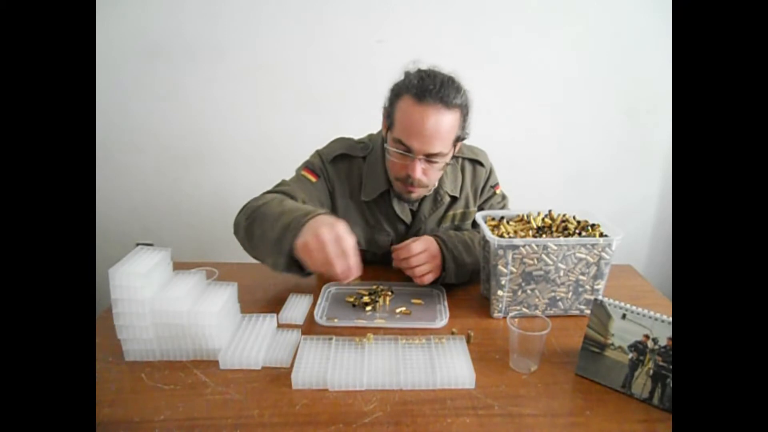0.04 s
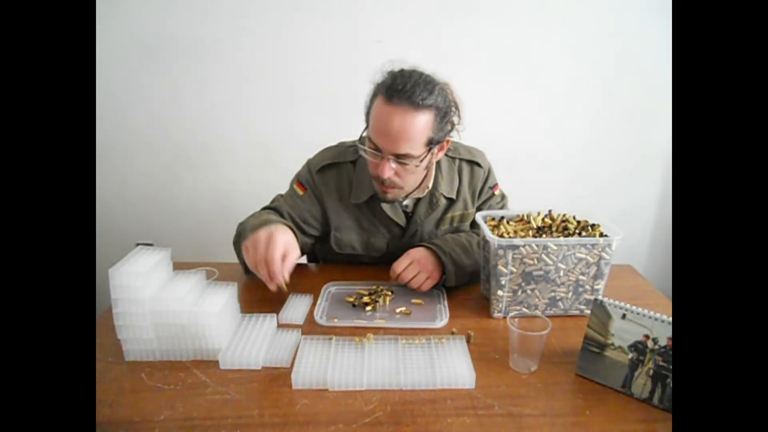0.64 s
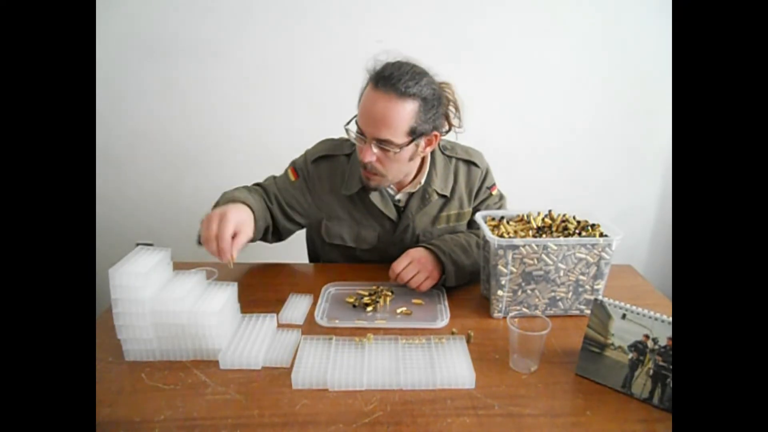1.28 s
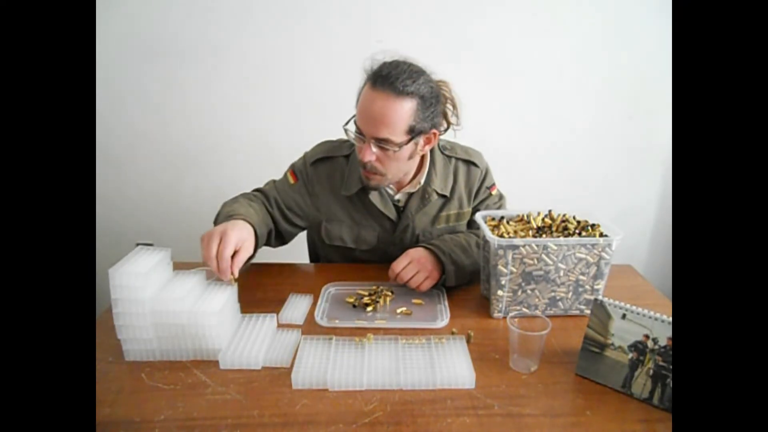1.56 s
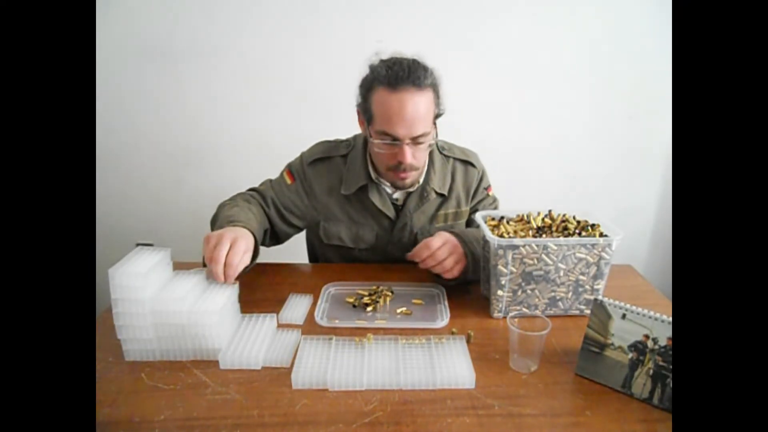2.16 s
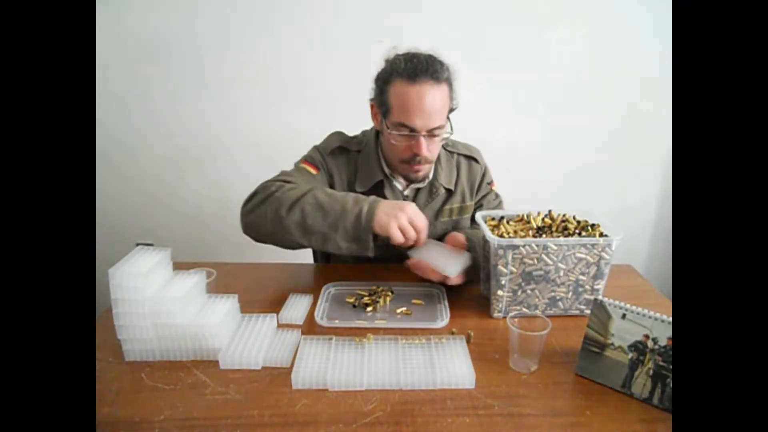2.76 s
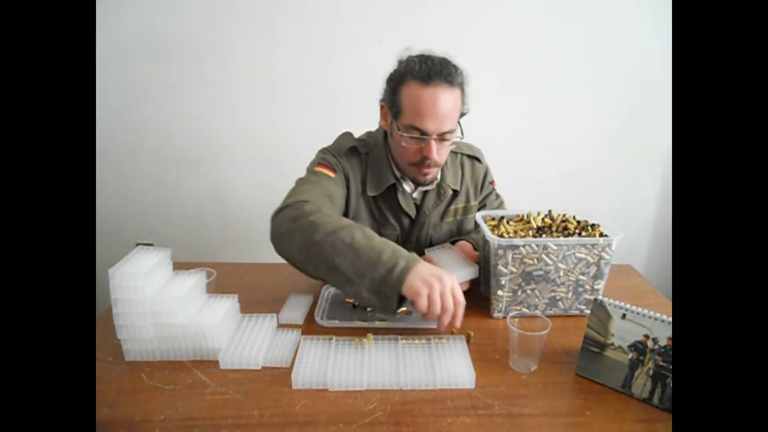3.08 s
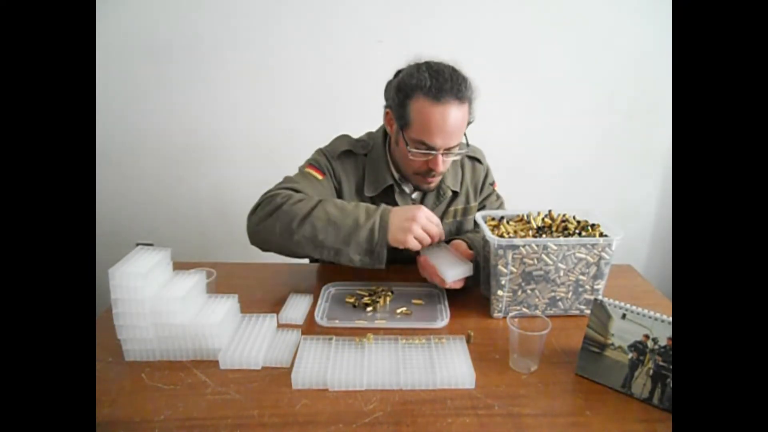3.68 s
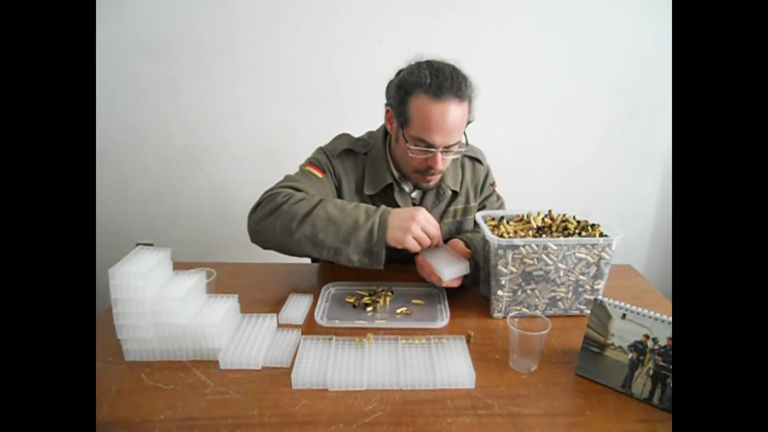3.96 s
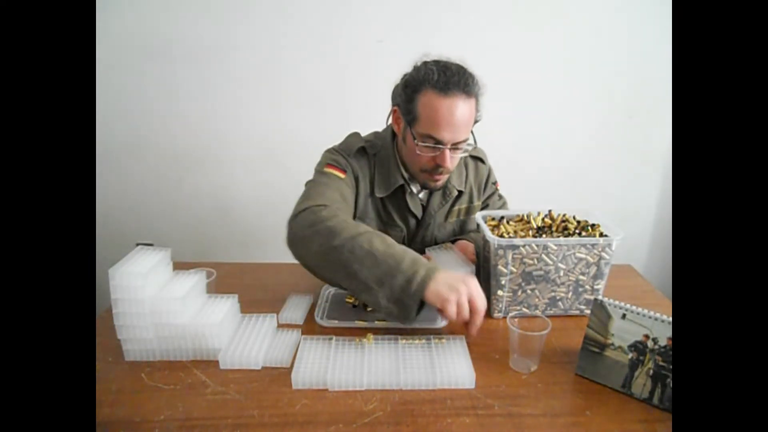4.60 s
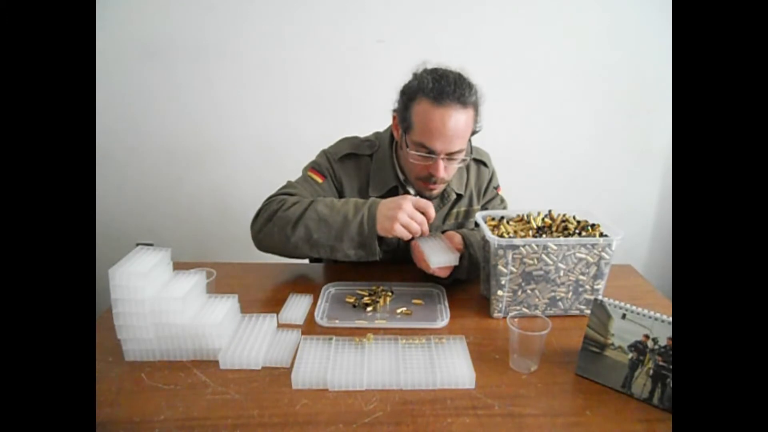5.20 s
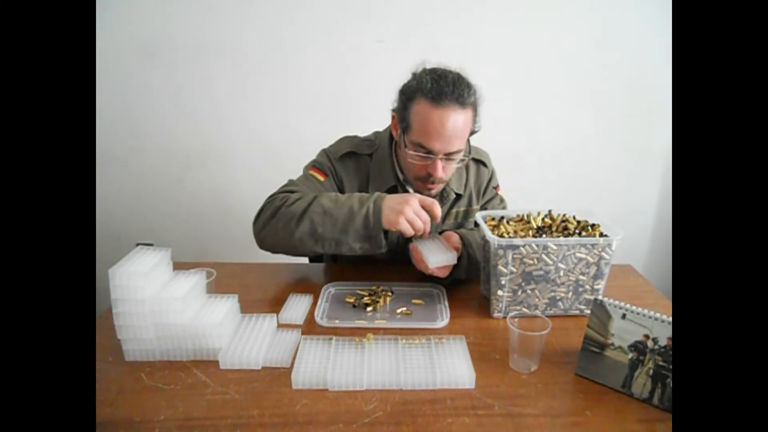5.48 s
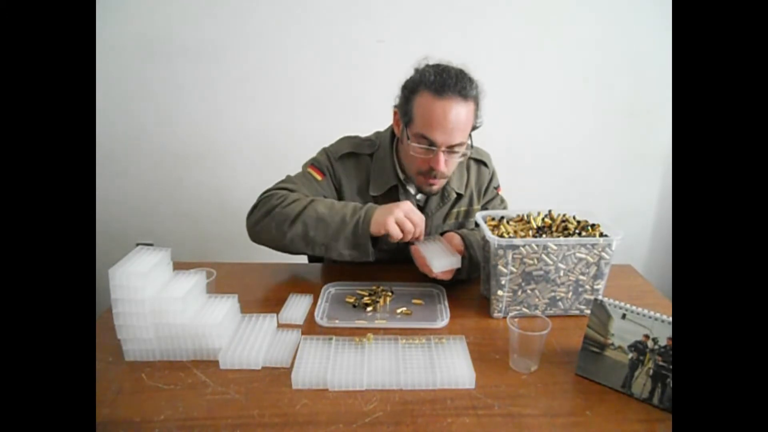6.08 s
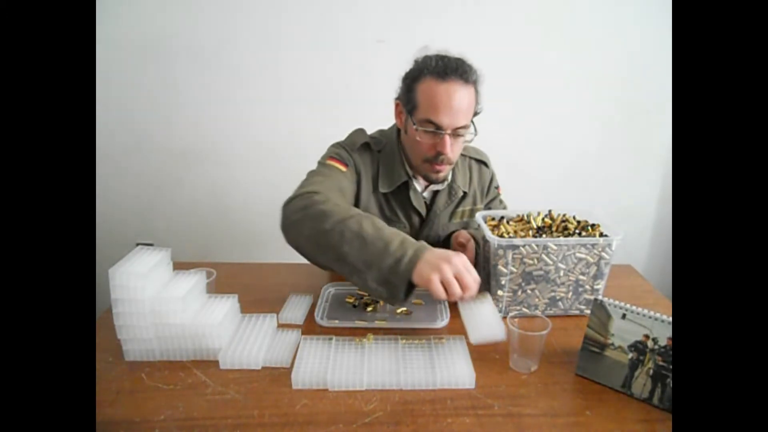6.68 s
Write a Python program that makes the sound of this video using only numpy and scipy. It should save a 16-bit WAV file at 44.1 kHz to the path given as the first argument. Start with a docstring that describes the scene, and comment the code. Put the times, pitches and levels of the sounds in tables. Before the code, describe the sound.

In a small, bare room with a soft hiss, plastic boxes bump gently on a table, with one harder knock. Metal cartridge cases rattle briefly, then one snaps sharply into a plastic box. Light clicks and scrapes continue with pauses, until a second sharp snap and a soft closing bump. The handling has a short echo, while faint, dry mechanical ticks come now and then from right beside the microphone.

```python
"""Cartridge cases into a plastic box

Brass cases are picked from a plastic tray and pushed into a plastic box at a wooden table.
Cases and boxes snap, rub and knock; the bare room rings after each blow.
A lens motor, probably, ticks near the microphone. Gain control ducks the hiss after the hardest blows."""
import sys
import numpy as np
from scipy import signal
from scipy.fft import rfft, irfft
from scipy.io import wavfile
from scipy.ndimage import minimum_filter1d

SR = 44100
rng = np.random.default_rng(int(sys.argv[2]) if len(sys.argv) > 2 else 0)


def put_to_file(sound):
    """Save the sound as 16-bit audio at rate SR, in the file named by the first command-line argument."""
    columns = np.atleast_2d(sound).T  # one column per channel
    safe = np.clip(columns, -1, 1)
    whole_steps = np.round(safe * 32767)
    wavfile.write(sys.argv[1], SR, whole_steps.astype(np.int16))


N = 301681
AGE = np.arange(SR // 4) / SR   # time since contact [s]


def from_db(db):
    """Decibels to gain."""
    return 10 ** (np.asarray(db) / 20)


def rms_one(x):
    """Scale to unit rms."""
    return x / np.sqrt(np.mean(x ** 2) + 1e-20)


def at_hz(points, hz, column=1):
    """Interpolate a table column over log frequency."""
    points = np.array(points)
    return np.interp(np.log(np.maximum(hz, 1)), np.log(points[:, 0]), points[:, column])


def coloured(x, spectrum):
    """Apply a smooth gain curve."""
    gain = from_db(at_hz(spectrum, np.fft.rfftfreq(len(x), 1 / SR)))
    return irfft(rfft(x) * gain, len(x))


def cut(x, hz, kind, order=2):
    """Butterworth filter."""
    sos = signal.butter(order, np.clip(hz, 10, SR / 2 - 500), kind, fs=SR, output="sos")
    return signal.sosfilt(sos, x)


def fade(t, t60_s):
    """Exponential decay, 60 dB in t60_s."""
    return np.exp(-np.log(1000) * t / t60_s)


def add(track, time_s, sound):
    """Mix a sound in at time_s."""
    start = int(round(time_s * SR))
    track[start:start + len(sound)] += sound[:N - start]


def ring(hz, db, t60_s, phase=0):
    """One struck mode."""
    return from_db(db) * fade(AGE, t60_s) * np.sin(2 * np.pi * hz * AGE + phase)


def struck(modes):
    """A body's modes after one blow; neighbours swing in antiphase."""
    return sum((-1) ** k * ring(*mode) for k, mode in enumerate(modes))


def crack(t60_s, edge_hz):
    """Bright noise burst as hard surfaces meet."""
    return cut(rng.standard_normal(len(AGE)), edge_hz, "high", order=1) * fade(AGE, t60_s)


def hiss(level_db=-51.2):
    """Steady room and microphone noise."""
    # noise spectrum: (frequency [Hz], relative density [dB])
    spectrum = [(10, -24), (22, -5), (100, -4), (260, -4), (450, -4.5), (750, -5), (1260, -6), (2000, -8.5),
                (3500, -10), (7700, -13), (10250, -14.5), (11000, -17.5)]
    return from_db(level_db) * rms_one(coloured(rng.standard_normal(N), spectrum))


def room(x, first_echo_s=0.0014, build_s=0.0068):
    """Bare walls: a dense tail, each band dying at its own rate."""
    # reverberation: (frequency [Hz], energy re input [dB], t60 [s])
    reverb = [(123, -3, 0.73), (320, 8, 0.72), (590, 6.5, 0.47), (1150, 5, 0.517), (1840, 3.5, 0.67),
              (2604.5, -5.5, 0.6), (3935, -5, 0.6), (5990, -5, 0.26), (9996, 0, 0.47)]
    t = np.arange(int(0.9 * SR)) / SR
    onset = np.clip((t - first_echo_s) / build_s, 0, 1)
    edges_hz = np.geomspace(80, 14000, 20)
    response = 0
    for low, high in zip(edges_hz, edges_hz[1:]):
        hz = np.sqrt(low * high)
        band = cut(rng.standard_normal(len(t)), [low, high], "band", order=3)
        tail = band * onset * fade(t, at_hz(reverb, hz, column=2))
        share = np.sqrt((high - low) / (SR / 2) / len(t))
        response += from_db(at_hz(reverb, hz)) * share * rms_one(tail)
    return signal.fftconvolve(x, response)[:N]


def lens_steps(step_s=0.1338):
    """Even motor steps, three contacts each: (time [s], level [dB], housing [dB])."""
    # lens moves: (first step [s], last step [s], first stop level [dB], change per step [dB])
    runs = [(2.1788, 2.446, -32, -2.5), (3.3786, 3.512, -39.5, 2), (6.3833, 6.651, -32, 0.6)]
    contacts = []
    for first_s, last_s, db, change_db in runs:
        for k, time_s in enumerate(np.arange(first_s, last_s + step_s / 2, step_s)):
            release = (time_s - 0.0053, -43.5, -14)
            stop = (time_s, db + k * change_db, -1.5)
            rebound = (time_s + 0.0115, -49, -11)
            contacts += [release, stop, rebound]
    return contacts


def lens_ticks(detune=0.008):
    """Small parts chatter against a stop and shake the housing."""
    # lone ticks as the lens settles: (time [s], level [dB], housing [dB])
    settling = [(3.2434, -46, -2), (3.2761, -47, -3), (3.294, -46, -15), (3.3056, -40, -21),
                (4.1756, -41, -18.5), (4.1884, -36, -2), (4.229, -44, -8.5), (4.2484, -47, -3),
                (4.2622, -45, -6.5)]
    # mechanism and housing: (frequency [Hz], level [dB], t60 [s])
    lens_modes = [(3300, 3.5, 0.0058), (4261.7, -8.5, 0.022), (5920, 1.5, 0.011), (6480, 5.5, 0.0047),
                  (8260, 10, 0.0059), (9200, 6, 0.0045), (9940, -0.5, 0.008792)]
    housing_modes = [(1434, 1.5, 0.02), (1600, 0.5, 0.017645)]
    out = np.zeros(N)
    attack = 1 - fade(AGE, t60_s=0.0024233)
    for time_s, db, housing_db in lens_steps() + settling:
        parts = sum(ring(hz * rng.normal(1, detune), mode_db, t60_s, phase=rng.uniform(0, 2 * np.pi))
                    for hz, mode_db, t60_s in lens_modes)
        housing = from_db(housing_db) * sum(ring(*mode) for mode in housing_modes)
        edge = crack(t60_s=0.018, edge_hz=1300)
        add(out, time_s, from_db(db) * attack * (parts + housing + edge))
    return out


def rubs(grain_db=8.5, box_band_hz=(2370, 2590)):
    """Sliding: a dense run of tiny slips that ring the box."""
    # brass and fingers on plastic: (start [s], length [s], level [dB], box resonance trim [dB])
    strokes = [(0.129, 0.026, -57, -6), (1.91, 0.04, -56.5, -9), (1.999, 0.05, -57, -2),
               (2.614, 0.13, -56.5, 5), (3.886, 0.073, -50.5, 3.5), (3.976, 0.017, -52.5, -11.5),
               (4.013, 0.014, -46, -4), (4.027, 0.003, -35, -14), (5.595, 0.066, -52.5, -4.5),
               (6.765, 0.037, -48, -29)]
    # friction spectrum: (frequency [Hz], gain [dB])
    spectrum = [(500, 11), (1500, 5), (3200, 10), (5000, 7), (7500, 5), (9000, 2.5), (10200, 8.5),
                (12000, 3)]
    out = np.zeros(N)
    for start_s, length_s, db, box_db in strokes:
        count = int(length_s * SR)
        slips = rng.standard_normal(count) * from_db(grain_db * np.minimum(rng.exponential(1, count), 4))
        stroke = rms_one(slips) * np.sqrt(np.sin(np.pi * np.arange(count) / count))
        box = from_db(box_db + 11.5) * cut(stroke, box_band_hz, "band", order=1)
        add(out, start_s, from_db(db) * (coloured(stroke, spectrum) + box))
    return cut(out, 680.2, "high")


def tray_bumps(reach_octaves=0.28, depth_db=12):
    """Soft, slow-rising contacts; each spot favours the modes near one pitch."""
    # fingers, cases and box on the tray: (time [s], level [dB], favoured pitch [Hz])
    contacts = [(.137, -42, 950), (.280, -48, 1099), (.950, -47, 830), (3.1670, -38, 1010),
                (3.1743, -33, 1200), (3.2485, -55, 1403), (4.4580, -38.5, 700), (6.7735, -32.5, 1036),
                (6.8120, -39.5, 1002)]
    # plastic tray: (frequency [Hz], level [dB], t60 [s])
    tray_modes = [(537.35, 2.5, 0.017), (655, -1.5, 0.036), (883.08, 0.5, 0.03), (1046, -3, 0.045),
                  (1374, 4.5, 0.019), (1902.7, -9, 0.01233), (2950, 8, 0.019), (4500, -2, 0.0243)]
    out = np.zeros(N)
    attack = 1 - fade(AGE, t60_s=0.0074)
    for time_s, db, favoured_hz in contacts:
        modes = []
        for hz, mode_db, t60_s in tray_modes:
            nearness = np.exp(-(np.log2(hz / favoured_hz) / reach_octaves) ** 2 / 2)
            modes.append((hz, mode_db - depth_db * (1 - nearness), t60_s))
        scuff = from_db(-2) * cut(crack(t60_s=0.0417, edge_hz=370), 4000, "low")
        add(out, time_s, from_db(db) * attack * (struck(modes) + scuff))
    return cut(out, 257.4, "high")


def case_clinks():
    """A loose case rings higher and longer than the box."""
    # rattles as cases and box are moved: (time [s], level [dB], crack [dB])
    contacts = [(2.6175, -36, 2), (2.6250, -31, -3), (2.6470, -39, -12), (2.6545, -41, -15),
                (2.6864, -30, 3.5), (5.2135, -40.5, 4), (6.7712, -43.5, 12.5), (6.7983, -49, 7)]
    # case loose in its slot: (frequency [Hz], level [dB], t60 [s])
    case_modes = [(2366, -2, 0.028), (2660, 0, 0.0086), (4300, -17, 0.03), (5370, -15, 0.025),
                  (7892, -14, 0.014), (9400, -9.5, 0.014)]
    out = np.zeros(N)
    for time_s, db, crack_db in contacts:
        edge = from_db(crack_db) * crack(t60_s=0.01, edge_hz=1200)
        add(out, time_s, from_db(db) * (struck(case_modes) + edge))
    return out


def stack_knocks(boom_db=-11.5, loss_db_per_octave=2, soft_contact_hz=800):
    """Softer, longer contacts lose the upper modes and drive the table harder."""
    # case and box set on the stack: (time [s], level [dB], contact cut-off [Hz], crack [dB])
    contacts = [(1.4308, -32, 1180, -21), (1.471, -34.5, 790, -21), (1.5306, -32, 1380, -7),
                (1.5556, -33, 850, -20), (1.6700, -30.5, 790, -16), (1.6922, -12, 4770, -15),
                (1.6940, -26, 5900, 0.5), (1.988, -30.5, 710, -14), (2.0030, -26, 920, -11),
                (2.113, -32, 750, -23), (2.1450, -33.5, 850, -19), (2.278, -41, 905, -20)]
    # stacked boxes: (frequency [Hz], level [dB], t60 [s])
    stack_modes = [(400, -33, 0.01815), (713, -9, 0.021), (937, -8.5, 0.024), (1230, 0, 0.0145),
                   (1417.6, -41, 0.0052), (1850, -18, 0.013), (2630, 4.5, 0.019), (3080, -5.5, 0.029),
                   (3611, -1.5, 0.0064), (4640, -22, 0.017)]
    table_mode = ring(hz=161.5, db=-5, t60_s=0.12)   # lowest bending mode
    out = np.zeros(N)
    for time_s, db, contact_hz, crack_db in contacts:
        boom = from_db(boom_db - loss_db_per_octave * np.log2(contact_hz / soft_contact_hz)) * table_mode
        body = cut(struck(stack_modes) + boom, contact_hz, "low")
        edge = from_db(crack_db) * crack(t60_s=0.017, edge_hz=490)
        add(out, time_s, from_db(db) * (body + edge))
    return cut(out, 112, "high")


def box_snaps(ring_stretch=1.083, crack_db=-9, crack_max_db=-32):
    """Hard contacts ring the damped box and the brass; the crack grows until the plastic gives."""
    # case against box: (time [s], level [dB], pitch [ratio], lowest three modes [dB])
    contacts = [(0.136, -37, 1.2, -12), (3.635, -7, 0.98, -2), (3.679, -15.5, 0.91, 3),
                (3.953, -32.5, 0.94, 6.5), (4.021, -38, 1.2, -8), (4.0273, -23, 0.93, 6),
                (4.0316, -21, 1.01, 0), (5.237, -40, 0.95, -2), (5.481, -38.5, 0.98, 2),
                (5.608, -31, 1, 3.5), (5.612, -26, 1.03, -1), (5.6625, -29, 1.14, -5),
                (5.6714, -5, 0.94, -2.5), (5.9558, -19, 0.975, -2.5)]
    # hand-held box: (frequency [Hz], level [dB], base t60 [s])
    box_modes = [(1285, -8.5, 0.01), (1460, -7.5, 0.013), (1920, -5, 0.0098), (2290, -2.5, 0.0099),
                 (2766, 0, 0.0087), (3240, -7.5, 0.011), (3470, -3, 0.0023), (5520, -27.5, 0.007)]
    # brass tube in the fingers: (frequency [Hz], level [dB], t60 [s])
    case_modes = [(10060, -30, 0.053), (9800, -18, 0.054)]
    out = np.zeros(N)
    for time_s, db, pitch, lower_db in contacts:
        body = struck([(hz * pitch, mode_db + lower_db * (k < 3), t60_s * ring_stretch)
                       for k, (hz, mode_db, t60_s) in enumerate(box_modes)])
        edge = crack(t60_s=0.013, edge_hz=660) + struck(case_modes)
        edge_db = min(db + crack_db, crack_max_db)
        add(out, time_s, cut(from_db(db) * body + from_db(edge_db) * edge, 650, "high"))
    return out


def gain_control(x, limit_db=-6.5, attack_s=0.00032, hold_s=0.71, recovery_db_per_s=9.5):
    """Peaks over the limit duck the gain; it holds, then creeps back."""
    over_db = np.maximum(20 * np.log10(np.abs(x) + 1e-9) - limit_db, 0)
    half_hold = int(hold_s * SR / 2)
    held_db = -minimum_filter1d(-over_db, 2 * half_hold + 1, origin=half_hold, mode="constant")
    ramp_db = recovery_db_per_s * np.arange(N) / SR
    duck_db = np.maximum.accumulate(held_db + ramp_db) - ramp_db
    pole = np.exp(-1 / (attack_s * SR))
    return x * from_db(-signal.lfilter([1 - pole], [1, -pole], duck_db))


def scene():
    """Stack near the microphone, tray heard mostly via the walls, lens too close for reverberation."""
    box = box_snaps() + case_clinks() + rubs()
    stack, tray = stack_knocks(), tray_bumps()
    direct = box + from_db(2.5) * stack + from_db(-1) * tray
    walls = room(from_db(-1.5) * box + stack + from_db(0.5) * tray)
    return (direct + walls + lens_ticks() + hiss())[None]


def record(dry):
    """Microphone roll-off above 10 kHz, gain control, steep low-pass."""
    # microphone treble: (frequency [Hz], gain [dB])
    roll_off = [(10250, -1.5), (10600, -7), (11000, -15.5), (11700, -14.5), (12200, -25), (12700, -45)]
    ducked = gain_control(coloured(dry[0], roll_off))
    return cut(ducked, 12600, "low", order=12)[None]


dry = scene()
out = record(dry)
put_to_file(out)
```